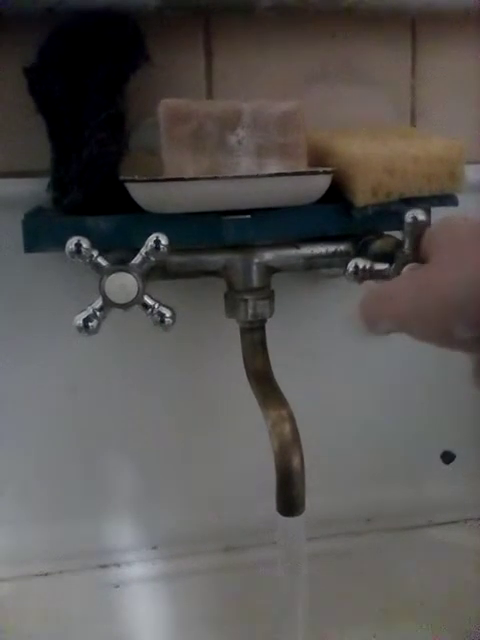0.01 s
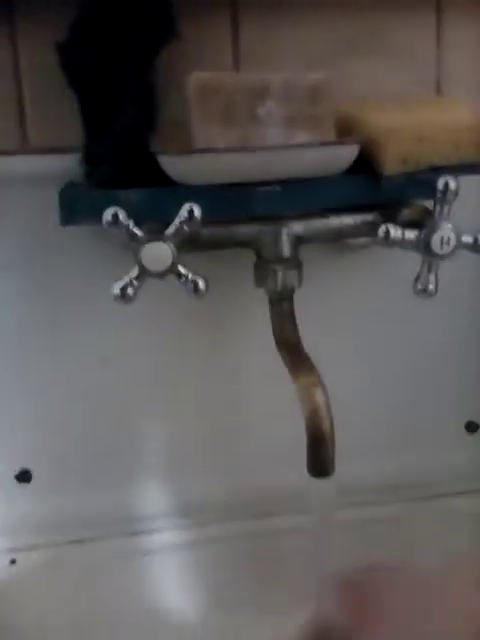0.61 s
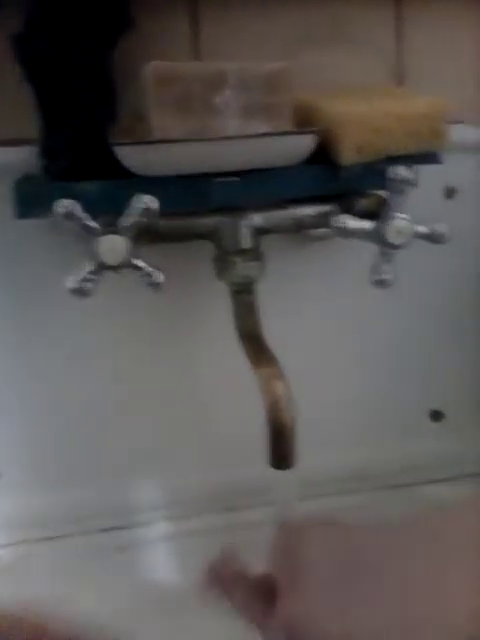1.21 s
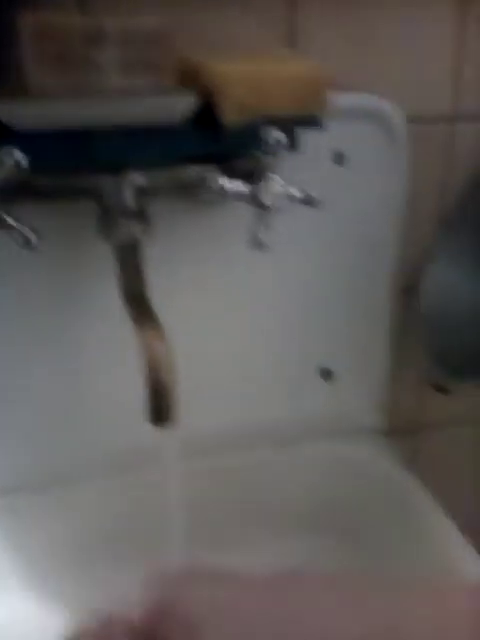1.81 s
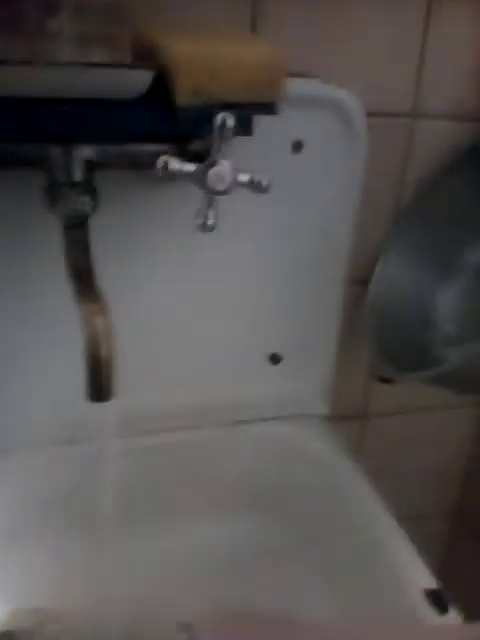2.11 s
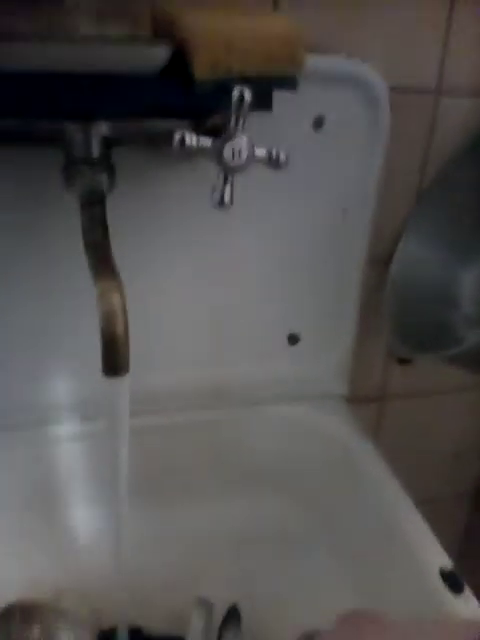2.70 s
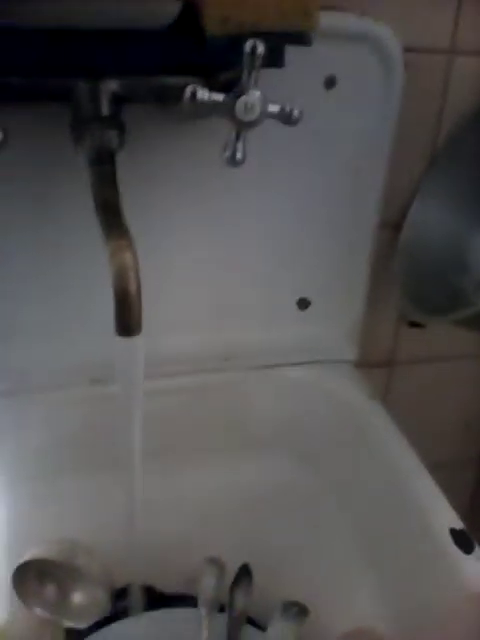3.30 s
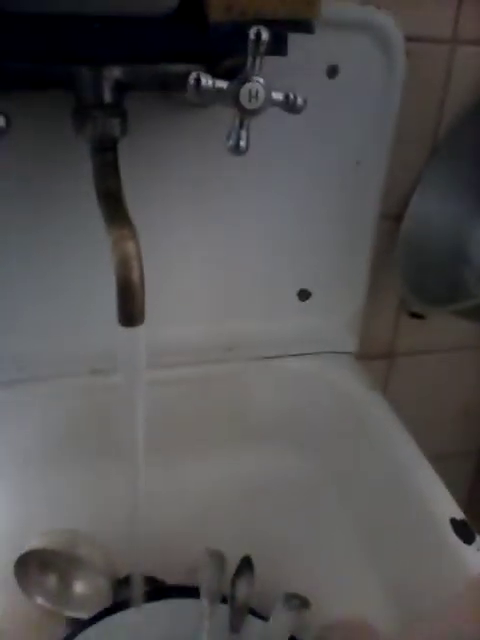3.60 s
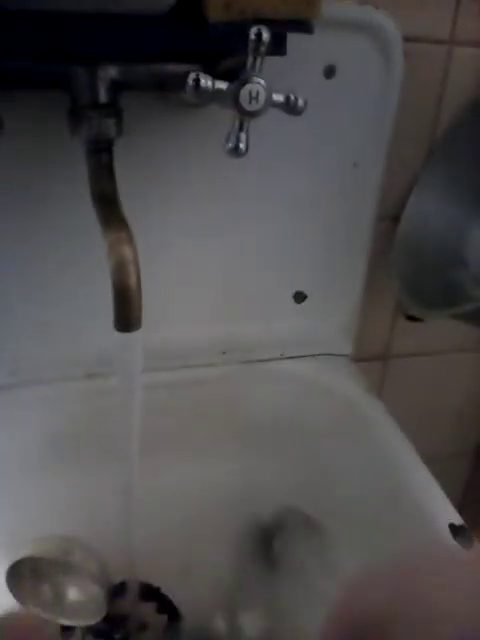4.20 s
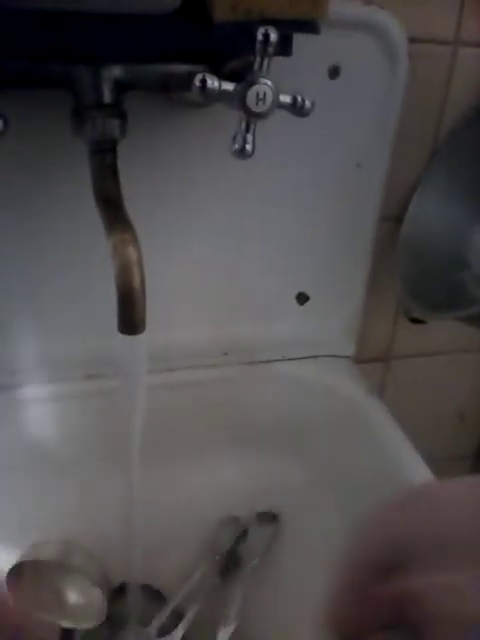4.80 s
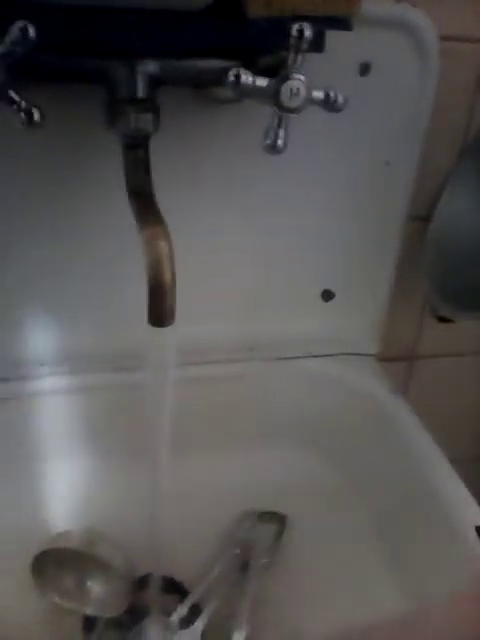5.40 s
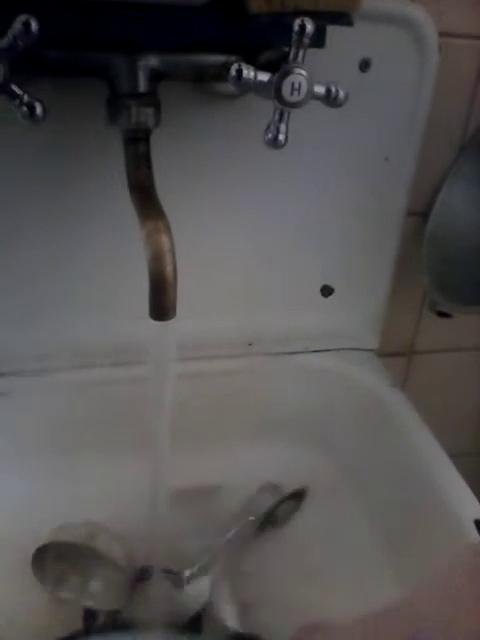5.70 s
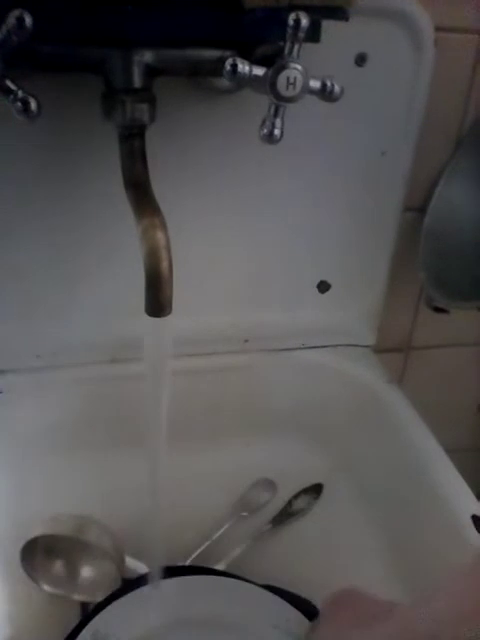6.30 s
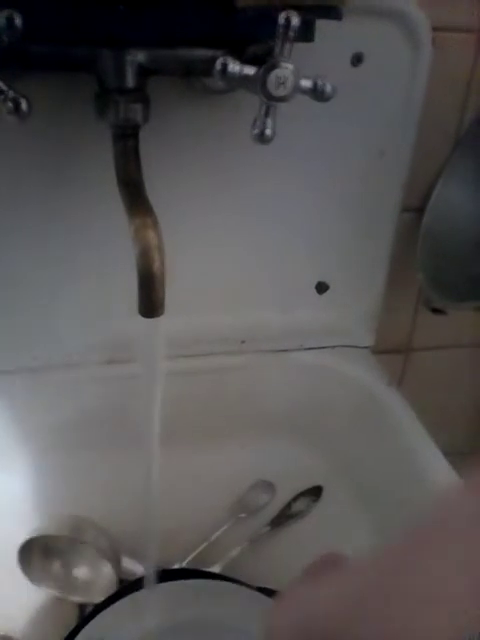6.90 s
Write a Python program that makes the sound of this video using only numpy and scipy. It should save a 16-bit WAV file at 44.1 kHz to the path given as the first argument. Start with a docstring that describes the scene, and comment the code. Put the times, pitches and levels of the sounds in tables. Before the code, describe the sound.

A tap runs into an enamelled steel sink throughout, heard from just above the basin in a small tiled kitchen with a slight echo. For the first second the stream spatters and gurgles, with distinct plopping drops. From about 1.1 to 1.8 seconds it drums with a hollow note, as if into something cupped beneath it. Bubbling and scattered splashes return until about 3.7 seconds, with a faint thin ring of water on cutlery. From 3.8 to 5 seconds a bowl and cutlery are shoved about, scraping, clinking and knocking against the ringing sink, louder than the water. After a short lull, a second bunch of clatter and scrapes runs from 5.3 to 6.3 seconds, strongest just before 6. A dull thump comes at about 6.5 seconds, and the water keeps splashing, with one light knock near 6.9 seconds.

```python
"""Rinsing dishes in a steel sink.

A tap runs into an enamelled steel sink in a small tiled kitchen, heard from just above the basin.
The jet spatters, traps bubbles and drums on the bottom while something is rinsed under it;
then a bowl and cutlery are shoved about and set down, clattering against the ringing sink."""
import sys
import numpy as np
from scipy import signal
from scipy.fft import rfft, irfft
from scipy.io import wavfile
from scipy.ndimage import uniform_filter1d

SR = 44100
rng = np.random.default_rng(int(sys.argv[2]) if len(sys.argv) > 2 else 0)


def digitize_waveform(pressure):
    """Quantize a signal to 16-bit integers and store it at the path in sys.argv[1].

    Rows of a 2-D input are taken as channels; values are limited to [-1, 1].
    """
    field = np.atleast_2d(pressure).T
    bounded = np.clip(field, -1, 1)
    quanta = np.round(bounded * 32767).astype(np.int16)
    wavfile.write(sys.argv[1], SR, quanta)


N = 307818


def undb(db):
    """Decibels to gain."""
    return 10 ** (np.asarray(db) / 20)


def unit(x):
    """Scale to an rms of 1."""
    return x / np.sqrt(np.mean(x ** 2))


def burst(x, samples=441):
    """Scale a short sound so that its loudest stretch has an rms of 1."""
    return x / np.sqrt(uniform_filter1d(x ** 2, samples, mode="constant").max())


def even(x, samples=6000):
    """Hold the slow level at an rms of 1 and keep the quick flicker."""
    return x / np.sqrt(uniform_filter1d(uniform_filter1d(x ** 2, samples), samples) + 1e-18)


def fade(t, t60):
    """Free decay, 60 dB down after t60 seconds."""
    return np.exp(-np.log(1000) * t / t60)


def note(t, hz, t60):
    """One struck mode."""
    return fade(t, t60) * np.sin(2 * np.pi * hz * t)


def add(out, start_s, x):
    """Mix x into out from start_s."""
    i = max(int(start_s * SR), 0)
    out[i:i + len(x)] += x[:max(N - i, 0)]


def through(x, response):
    """Pass x through an impulse response."""
    return signal.fftconvolve(x, response)[:len(x)]


def colour(points, samples=2048):
    """Minimum-phase impulse response with the given (Hz, dB) spectrum."""
    hz, db = np.transpose(points)
    grid_hz = np.maximum(np.fft.rfftfreq(samples, 1 / SR), 1)
    gain = undb(np.interp(np.log(grid_hz), np.log(hz), db))
    cepstrum = irfft(np.log(gain))
    cepstrum[1:samples // 2] *= 2
    cepstrum[samples // 2 + 1:] = 0
    return irfft(np.exp(rfft(cepstrum)))


def band(x, edges_hz, kind, order=3):
    """Butterworth filter."""
    return signal.sosfilt(signal.butter(order, edges_hz, kind, fs=SR, output="sos"), x + 1e-18)


def tuned(x, hz, width_hz, order):
    """A resonance whose centre may move from sample to sample."""
    carrier = np.exp(2j * np.pi * np.cumsum(hz) / SR)
    return 2 * (band(x / carrier, width_hz / 2, "low", order) * carrier).real


def walk(per_s):
    """Smooth random wandering with an rms of 1."""
    return unit(np.interp(np.arange(N) / SR * per_s, np.arange(2000), rng.standard_normal(2000)))


def impacts(per_s, spread_db):
    """Random impulses: most near size 1, a few up to five times spread_db away."""
    hit = rng.random(N) < per_s / SR
    return hit * rng.choice([-1, 1], N) * undb(spread_db * np.minimum(rng.exponential(size=N), 5))


def bubble(hz, cycles, glide):
    """A trapped bubble rings for some cycles and rises in pitch as it nears the surface."""
    life_s = cycles / hz
    t = np.arange(int(life_s * SR) + 2) / SR
    return fade(t, life_s) * np.sin(2 * np.pi * hz * t * (1 + glide * t / life_s / 2))


def swarm(centre_hz, octaves, cycles, count):
    """Many bubbles, each with its own time, size and pitch."""
    out = np.zeros(N)
    for when, rank, length, up, down in rng.random((count, 5)):
        hz = min(centre_hz * 2 ** (octaves * (up - down)), 0.4 * SR)
        gain = undb(-4 * np.log(max(rank, 0.005)))
        add(out, when * N / SR, gain * bubble(hz, cycles * (0.5 + length), glide=0.41))
    return unit(out)


def jet_resonance(curve, width_hz, flutter_db):
    """The jet keeps one resonance sounding in quick uneven throbs."""
    times_s, db, hz = np.transpose(curve)
    t = np.arange(N) / SR
    ring = tuned(impacts(per_s=600, spread_db=4.5), np.interp(t, times_s, hz), width_hz, order=2)
    throb = undb(flutter_db * walk(per_s=28))
    return even(ring * throb) * np.interp(t, times_s, undb(db), left=0, right=0)


# Each row: centre in Hz, width in Hz, gain in dB.
BASIN_RESONANCES = [(580, 38, 0), (652.3, 17, 7.5), (1890, 400, 1.5), (2660, 123, 4), (3600, 510, -4.5)]


def basin(x):
    """The wet basin lifts a few broad resonances; hands and water keep retuning them."""
    ring = sum(undb(db) * tuned(x, hz * (1 + 0.014 * walk(per_s=4)), width_hz, order=1)
               for hz, width_hz, db in BASIN_RESONANCES)
    return x + undb(16) * ring


# Each row: time in seconds, level in dB, pitch in Hz.
POOL_CURVE = [(0, -50, 1030), (0.28, -45, 1050), (0.6, -46, 980), (0.7, -66, 1190), (0.82, -53.5, 1300),
              (1.05, -77, 1400), (1.69, -74, 980), (1.75, -47, 970), (1.87, -58, 970), (2.7, -53, 1030),
              (3.7, -49, 1040), (4.9, -53, 1080), (5.1, -71, 1130), (6.45, -84, 1450), (6.57, -51, 1540),
              (6.69, -79, 1450), (6.77, -53, 1430), (6.85, -76, 1400), (6.95, -44, 1010)]


def pool():
    """The jet gurgles in a shallow pool, higher and fainter as the pool thins."""
    return jet_resonance(POOL_CURVE, width_hz=200, flutter_db=5)


# Spectra of the jet's layers. Each row: frequency in Hz, gain in dB.
BUBBLE_SPECTRUM = [(300, -50), (600, -9), (1000, 5), (1300, -6.5), (3000, -0.5), (4500, 5.5), (7000, -35),
                   (15000, -48)]
SPRAY_SPECTRUM = [(400, -23), (1500, -16), (3000, -3), (6300, -3), (8200, -9.5), (9300, -2.5), (10200, -5),
                  (12000, -12.5), (13500, -18), (15500, -8)]
DRUM_SPECTRUM = [(30, -23), (90, -24), (170, -18.5), (250, -22), (340, -2.5), (450, -1.5), (560, 2.5),
                 (680, -5.5), (850, -12.5), (1500, -17), (5000, -33.5)]
# Each row: time in seconds, bubbling in dB, spray in dB, drumming in dB.
JET_LEVELS = [(0.0, -42, -44.5, -52), (0.45, -49.5, -43.5, -47.5), (0.72, -50.5, -48, -58),
              (1.1, -61, -44.5, -58.5), (1.55, -68, -48.5, -57.5), (1.62, -64, -41.5, -54),
              (1.72, -51, -38.5, -56), (1.82, -42.5, -49.5, -56), (2.12, -49, -49.5, -54.5),
              (2.78, -44.5, -46.5, -57.5), (2.92, -53, -49.5, -60), (3.02, -42, -45, -59.5),
              (3.35, -45, -49, -56.5), (3.46, -46, -49.5, -47), (3.58, -48, -50.5, -59.5),
              (3.78, -54, -44, -49.5), (4.15, -42, -49.5, -42), (5.05, -72, -51.5, -55),
              (5.3, -55, -48.5, -60.5), (6.55, -58, -53, -52.5), (6.949, -48.5, -50.5, -68.5)]


def tap():
    """The jet lands on standing water or bare steel: bubbles, fine spray and drumming."""
    times_s, *levels_db = np.transpose(JET_LEVELS)
    t = np.arange(N) / SR
    bubble_gain, spray_gain, drum_gain = (undb(np.interp(t, times_s, db)) for db in levels_db)
    slosh = undb(2.5 * walk(per_s=20))
    bubble_gain = np.hypot(bubble_gain * slosh, gulps())
    surge = walk(per_s=45)
    bubbles = swarm(centre_hz=2140, octaves=2.005, cycles=23, count=8000) * undb(4 * surge)
    bubbles = even(basin(through(bubbles, colour(BUBBLE_SPECTRUM))), samples=3500)
    fizz = swarm(centre_hz=6310, octaves=2.044, cycles=16, count=12000)
    ticks = unit(impacts(per_s=900, spread_db=5))
    spray = even(through(fizz + undb(-5.5) * ticks, colour(SPRAY_SPECTRUM)))
    patter = impacts(per_s=1300, spread_db=0.5) * undb(2 * surge)
    drum = even(through(patter, colour(DRUM_SPECTRUM)))
    return bubbles * bubble_gain + spray * spray_gain + drum * drum_gain + pool() * slosh


# Each row: start in seconds, level in dB, bubble pitch in Hz.
BIG_DROPS = [(0.135, -28.5, 1075), (0.15, -27.5, 3160), (0.175, -30, 6650), (0.215, -32, 1890),
             (0.257, -22, 2900), (0.27, -25.5, 3040), (0.3633, -21, 2930), (0.368, -27, 6000),
             (0.578, -26.5, 3740), (0.63, -28, 3220), (0.9, -29.5, 3650), (1.488, -34.5, 667),
             (1.624, -35, 6950), (1.716, -33, 4270), (1.803, -32, 3770), (2.045, -27.5, 2650),
             (2.169, -37.5, 950), (2.228, -27, 1890), (2.422, -26.5, 2750), (2.472, -30.5, 2010),
             (2.512, -35, 1830), (2.752, -30.5, 1910), (2.959, -25.5, 2700), (2.969, -26.5, 2180),
             (3.113, -30, 2830), (3.189, -29.5, 2600), (3.287, -32, 3100), (3.391, -23, 2000),
             (3.445, -26.5, 1870), (3.531, -26.5, 3300), (3.628, -33, 3230), (3.657, -26, 1850),
             (4.829, -29.5, 3940), (6.493, -33.5, 1525), (6.543, -36.5, 1920), (6.585, -38, 3560),
             (6.932, -33.5, 1620)]


def plops(cycles=53, swell_s=0.00063, wake_s=0.028, wake_octaves=0.39):
    """A large drop splashes and leaves one bubble ringing, with nine fainter ones in its wake."""
    out, t = np.zeros(N), np.arange(SR // 16) / SR
    for start_s, db, hz in BIG_DROPS:
        splash = band(rng.standard_normal(len(t)) * fade(t, 0.037), [1200, 6000], "band", order=2)
        add(out, start_s, undb(db - 16.5) * burst(splash, samples=220))
        ring = bubble(hz, cycles, glide=0.046)
        ring *= -np.expm1(-np.arange(len(ring)) / SR / swell_s)
        add(out, start_s, undb(db - 3.5) * burst(ring, samples=220))
        for late, pitch in rng.random((9, 2)):
            satellite = bubble(hz * 2 ** (wake_octaves * (2 * pitch - 1)), cycles / 2, glide=0.21)
            add(out, start_s + wake_s * late, undb(db - 12.5) * (1 - 0.5 * late) * satellite)
    return band(out, 340, "high", order=2)


def gulps():
    """Gain envelope: each big bubble drags in air, so the bubbling jumps and dies away."""
    out, t = np.zeros(N), np.arange(SR // 3) / SR
    for start_s, db, _ in BIG_DROPS:
        add(out, start_s, undb(db - 15.5) * fade(t, 0.18))
    return out


# Each row: start in seconds, level in dB. The last row is a piece of cutlery ticking, played the same way.
DROPS_ON_METAL = [(0.217, -30.5), (0.3638, -32.5), (0.902, -38), (1.4927, -35.5), (1.625, -31), (1.73, -32),
                  (3.271, -27.5), (3.379, -29), (5.118, -35.5)]


def slaps():
    """A drop bursts on bare metal, or a piece of cutlery ticks, with a short bright tick that traps no air."""
    out, t = np.zeros(N), np.arange(SR // 32) / SR
    for start_s, db in DROPS_ON_METAL:
        tick = through(rng.standard_normal(len(t)) * fade(t, 0.0051), colour(SPRAY_SPECTRUM))
        add(out, start_s, undb(db) * burst(tick, samples=110))
    return band(out, 9600, "low")


# Each row: time in seconds, level in dB, pitch in Hz.
HOLLOW_CURVE = [(1.1, -68, 704), (1.28, -56.5, 673), (1.42, -49.5, 662), (1.52, -48.5, 650),
                (1.63, -45.5, 645), (1.78, -64, 640)]


def hollow():
    """Water drums into a cupped hollow held under the jet."""
    return jet_resonance(HOLLOW_CURVE, width_hz=56, flutter_db=4.5)


# Each row: time in seconds, level in dB, pitch in Hz.
CUTLERY_CURVE = [(2.6, -84, 5380), (2.85, -62, 5500), (3.75, -59, 5620), (4.85, -49, 5880),
                 (4.96, -59, 5050), (5.06, -58, 5070), (5.25, -60, 5530)]


def cutlery_ring():
    """The jet keeps a piece of cutlery ringing thinly."""
    return jet_resonance(CUTLERY_CURVE, width_hz=70, flutter_db=3.5)


# Modes of the sink and its load. Each row: frequency in Hz, gain in dB, t60 in seconds.
LOADED_SINK_MODES = [(335.2, 8, 0.2), (388.3, 10, 0.25), (462, 0, 0.43), (543, 3, 0.7), (630.2, -2.5, 0.19),
                     (826, -4, 0.28), (896, 3.5, 0.075), (968, 3, 0.49), (1129, 5, 0.3), (1446, 7.5, 0.23),
                     (1825, -4, 0.54), (2190, 2, 0.22), (2900, 0.5, 0.097), (6080, 11, 0.08)]
# Spectrum of scrapes and knocks. Each row: frequency in Hz, gain in dB.
DISH_SPECTRUM = [(18, -111), (30, -29.5), (90, -33), (190, -28.5), (328, -7), (499, -8), (632, -3),
                 (760, -7), (1130, -9), (1540, -11.5), (1860, -8), (6500, -12.5), (8200, -18),
                 (9970, -15.5), (13000, -32), (14800, -30), (16000, -22)]
# Each row: start in seconds, length in seconds, level in dB.
DISH_SLIDES = [(3.792, 0.22, -41), (4.002, 0.14, -34.5), (4.284, 0.16, -35), (4.41, 0.05, -40),
               (4.652, 0.31, -45.5), (5.422, 0.068, -31.5), (5.53, 0.17, -34.5), (5.748, 0.027, -20.5),
               (5.87, 0.23, -32), (6.251, 0.11, -35)]


def scraping(attack_s=0.06, release_t60=0.32, width_hz=47):
    """Rims catch and slip on the enamel: dense tiny slips that keep the sink's modes sounding."""
    effort, t = np.zeros(N), np.arange(SR) / SR
    for start_s, length_s, db in DISH_SLIDES:
        release = fade(np.maximum(t - length_s, 0), release_t60)
        add(effort, start_s, undb(db) * np.minimum(t / attack_s, 1) * release)
    slips = impacts(per_s=2200, spread_db=-4) * undb(3 * walk(per_s=100))
    ring = sum(undb(db) * signal.lfilter(*signal.iirpeak(hz, hz / width_hz, fs=SR), slips)
               for hz, db, _ in LOADED_SINK_MODES[:-1])  # too soft for the top mode
    rub = through(slips + undb(4) * ring, colour(DISH_SPECTRUM))
    return even(rub) * effort


def sink_ring(t, t60, weight_db, detune=0.0196, walls_hz=(537.2, 590.3, 640), bottom_hz=393.1):
    """A blow is shared among modes that the load damps and detunes; heavy ones reach the bottom."""
    chance = rng.standard_normal((len(LOADED_SINK_MODES), 2))
    modes = sum(share * undb(db) * note(t, hz * (1 + detune * pull), min(mode_t60, t60))
                for (hz, db, mode_t60), (share, pull) in zip(LOADED_SINK_MODES, chance))
    walls = sum(rng.uniform(-0.23, 1) * note(t, hz, 1.07 * t60) for hz in walls_hz)
    bottom = note(t, bottom_hz, 0.65 * t60)
    return undb(-23.5) * modes + undb(-15) * walls + undb(-19.5 + 0.87 * weight_db) * bottom


def piece_ring(t, t60):
    """The uneven modes of a bowl or spoon, different for every way it is held and hit."""
    return sum(gain * note(t, 700 * 10 ** decades, t60 * (0.5 + life))
               for decades, gain, life in rng.random((10, 3)))


def rattle(t, per_s=260, spread_db=5.5):
    """The crowd of loose pieces sounds in quick uneven clacks."""
    steps = np.arange(int(t[-1] * per_s) + 2)
    steps_db = spread_db * np.minimum(rng.standard_normal(len(steps)), 2)
    clacks = undb(np.interp(t * per_s, steps, steps_db))
    return unit(rng.standard_normal(len(t)) * clacks)


def contacts(t, bounces_per_s, bounce_db, settle_t60):
    """One blow followed by the dying chatter of loose pieces."""
    hit = rng.random(len(t)) < bounces_per_s / SR
    train = hit * rng.standard_normal(len(t)) * undb(bounce_db) * fade(t, settle_t60)
    train[0] = 1
    return train


# Each row: start in seconds, strength in dB, weight (thump) in dB, hardness (clink) in dB,
# t60 in seconds, the piece's own note in Hz.
DISH_KNOCKS = [(3.7959, -7, -6.5, -17.5, 0.26, 1107), (3.8276, -9.5, -20, -18.5, 0.087, 900),
               (3.871, -10, -6.5, -14.5, 0.22, 1440), (3.8938, -14.5, -7.5, -33, 0.47, 917),
               (4.0447, -18.5, 4.5, -26, 0.1, 1277), (4.184, -6.5, -15, -13.5, 0.31, 2710),
               (4.2062, -7.5, -26, -10, 0.29, 2840), (4.2446, -10, -14, -22, 0.42, 2750),
               (4.296, -10.5, -33, -17.5, 0.49, 3220), (4.3668, -16.5, -2, -34, 0.077, 1076),
               (4.4621, -5, -9, -10.5, 0.28, 4260), (4.5416, -9.5, -10, -15, 0.4, 1170),
               (4.5777, -13, -5, -40, 0.31, 1137), (4.645, -10, -8, -16, 0.25, 1165),
               (4.657, -10, -11.5, -14.5, 0.29, 1094), (4.86, -7, -11.5, -20.5, 0.25, 1613),
               (4.894, -12.5, -6.5, -23, 0.22, 1164), (4.9202, -12, -26, -18, 0.14, 880),
               (5.3228, -9, -9.5, -20, 0.24, 1880), (5.3627, -9.5, -9.5, -17, 0.22, 2366),
               (5.413, -8, -13.5, -11, 0.25, 1880), (5.4451, -8, -7, -13.5, 0.33, 2330),
               (5.6032, -10, -0.5, -21.5, 0.3, 1400), (5.631, -12.5, -10, -12.5, 0.37, 4300),
               (5.6615, -8.5, -22, -9.5, 0.27, 3160), (5.7132, -10, -10.5, -17, 0.18, 1690),
               (5.8329, -2.5, -12, -14.5, 0.12, 1694), (5.8535, -5.5, -12, -10.5, 0.41, 1070),
               (5.8893, -5, -9.5, -15, 0.22, 1286), (5.9097, -13.5, -10, -6.5, 0.27, 3300),
               (5.944, -8, -21, -11, 0.5, 975), (5.992, -8.5, -17.5, -6, 0.21, 3330),
               (6.087, -7.5, -20, -12, 0.19, 1150), (6.104, -7.5, -10, -16, 0.2, 2924),
               (6.2788, -11, -4, -8, 0.12, 3120), (6.4573, -45.5, 18, -4, 0.16, 880),
               (6.9336, -23, -5.5, -30, 0.17, 1100)]


def clatter(crack_db=13.5, crack_t60=0.0051, contact_s=0.00084, heave_s=0.0031):
    """Each knock cracks, then rings the sink, the piece itself and the dishes round it."""
    out, t = np.zeros(N), np.arange(SR // 4) / SR
    tone = colour(DISH_SPECTRUM)
    for start_s, strength_db, weight_db, hardness_db, t60, note_hz in DISH_KNOCKS:
        ring = sink_ring(t, t60, weight_db) + undb(-16) * piece_ring(t, t60 / 2)
        # A soft contact brings out the held piece's brief note and loses its top.
        ring += undb(-10 - 0.5 * hardness_db) * note(t, note_hz, t60=0.049)
        cutoff_hz = min(25800 * undb(0.52 * hardness_db), SR / 2 - 2000)
        crowd = rattle(t)
        blows = contacts(t, bounces_per_s=190, bounce_db=-2, settle_t60=0.46 * t60)
        push = band(through(blows, tone), cutoff_hz, "low", order=2)
        registers = [(900, "low", weight_db - 7, 1, heave_s),  # the heavy sink builds up slowest
                     ([900, 4000], "band", -12, 1, contact_s),
                     (4000, "high", hardness_db - 5.5, 0.37, contact_s)]
        for edges_hz, kind, db, stretch, swell_s in registers:
            decay = fade(t, t60 * stretch) + undb(crack_db) * fade(t, crack_t60 * stretch)
            body = (ring + crowd * decay) * -np.expm1(-t / swell_s)
            knock = band(through(body, push), edges_hz, kind)
            add(out, start_s, undb(strength_db + db) * burst(knock))
    return out


# Each row: frequency in Hz, gain in dB.
SPOON_PARTIALS = [(4480, -5), (5710, 5), (6400, -2), (7050, -3), (9750, -1), (10600, -6)]
# Each row: start in seconds, level in dB.
SPOON_HITS = [(3.7968, -20), (3.87, -33), (3.939, -45), (4.0684, -34), (4.185, -18.5), (4.2956, -31),
              (4.645, -27.5), (5.413, -20), (5.521, -32), (5.6167, -25.5), (5.8323, -24), (5.944, -20),
              (6.0591, -32), (6.2784, -26.5), (6.355, -52)]


def clinks(t60=0.031, detune=0.0144):
    """A spoon ticks and bounces, ringing its high modes; the point of contact picks their shares."""
    out, t = np.zeros(N), np.arange(SR // 8) / SR
    for start_s, db in SPOON_HITS:
        chance = rng.standard_normal((len(SPOON_PARTIALS), 2))
        ring = sum(share * undb(mode_db) * note(t, hz * (1 + detune * pull), t60)
                   for (hz, mode_db), (share, pull) in zip(SPOON_PARTIALS, chance))
        tick = band(rng.standard_normal(len(t)) * fade(t, 0.011), [2500, 7000], "band", order=1)
        blows = contacts(t, bounces_per_s=360, bounce_db=-4, settle_t60=2 * t60)
        clink = through(ring + undb(12) * tick, blows)
        add(out, start_s, undb(db) * burst(clink, samples=220))
    return out


# Each row: start in seconds, level in dB, pitch in Hz, t60 in seconds.
FREED_PIECES = [(4.262, -34, 2840, 0.18), (4.468, -15.5, 600, 0.084), (4.187, -28, 2159, 0.45),
                (4.662, -31, 3900, 0.21), (4.895, -20.5, 616, 0.21), (5.365, -16, 1870, 0.11),
                (5.607, -18.5, 393, 0.26), (5.625, -18, 334, 0.11), (5.916, -17, 3030, 0.07),
                (5.975, -23.5, 543, 0.87), (6.09, -44, 203, 0.8), (6.125, -25, 3040, 0.11),
                (6.282, -24.5, 400, 0.16)]


def after_rings(swell_s=0.0012):
    """A piece that comes free after a knock rings on as a close, beating pair of modes."""
    out, t = np.zeros(N), np.arange(SR // 2) / SR
    for start_s, db, hz, t60 in FREED_PIECES:
        twin_hz = hz * (1 + 0.0097 * rng.uniform(0.32, 1.75))
        pair = note(t, hz, t60) + 0.5 * note(t, twin_hz, t60)
        add(out, start_s, undb(db) * pair * -np.expm1(-t / swell_s))
    return out


def reflections(x, sink_db, sink_t60, room_db, room_t60, paths):
    """Echoes of the sink, then the tiled kitchen; several paths crossfade as hands and water move."""
    t = np.arange(SR // 3) / SR
    shares = np.exp([1.87 * walk(per_s=5.4) for _ in range(paths)])
    out = x
    for share in shares / np.linalg.norm(shares, axis=0):
        sink = rng.standard_normal(len(t)) * fade(t, sink_t60) * (t > 0.0008)
        room = rng.standard_normal(len(t)) * fade(t, room_t60) * (t > 0.006)
        sink *= undb(sink_db) / np.linalg.norm(sink)
        room *= undb(room_db) / np.linalg.norm(room)
        out = out + through(x * share, sink + room)
    return out


def scene():
    """Water and dishes, each with its reflections, in mono."""
    water = tap() + plops() + hollow() + cutlery_ring()
    dishes = clatter() + scraping() + after_rings() + clinks()
    water = reflections(water + slaps(), sink_db=-1, sink_t60=0.03, room_db=-7.5, room_t60=0.23, paths=4)
    dishes = reflections(dishes, sink_db=-8, sink_t60=0.036, room_db=-14, room_t60=0.13, paths=1)
    return (water + dishes)[None]


def record(dry):
    """The microphone rounds the loudest peaks; the top is cut at 15.9 kHz."""
    rounded = np.tanh(1.204 * dry) / 1.073
    return signal.sosfilt(signal.ellip(10, 0.2, 70, 15900, fs=SR, output="sos"), rounded)


dry = scene()
out = record(dry)
digitize_waveform(out)
```